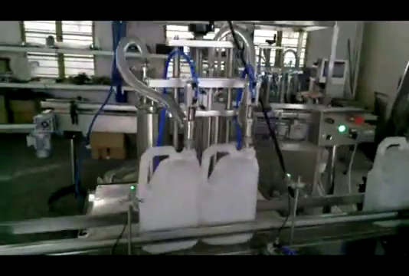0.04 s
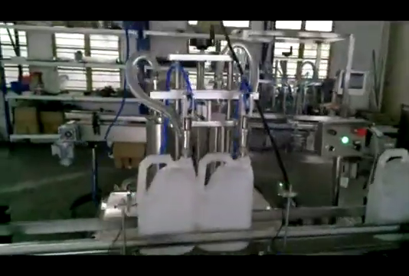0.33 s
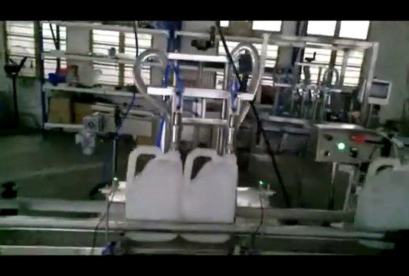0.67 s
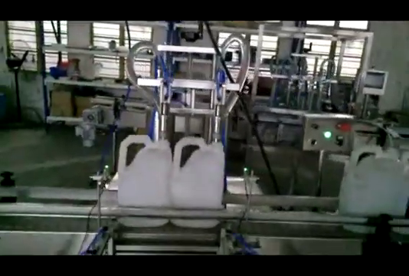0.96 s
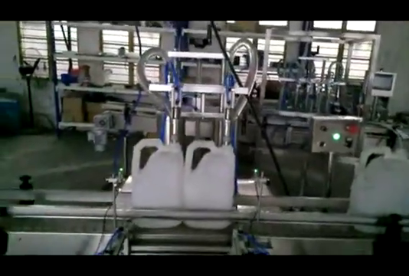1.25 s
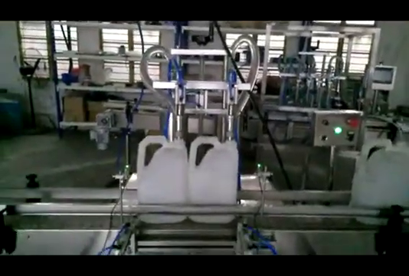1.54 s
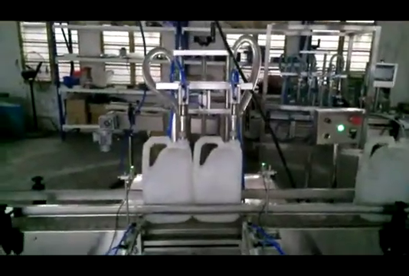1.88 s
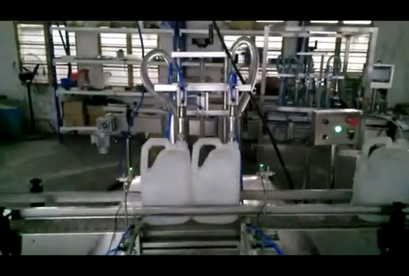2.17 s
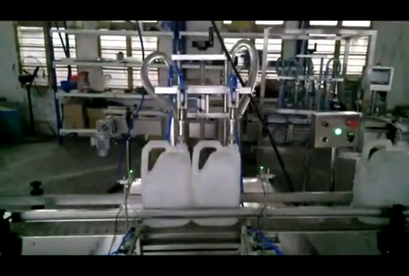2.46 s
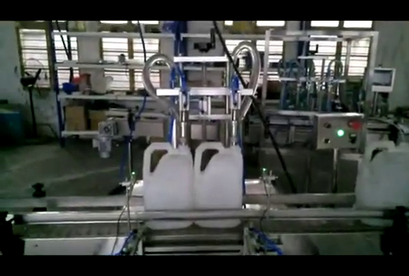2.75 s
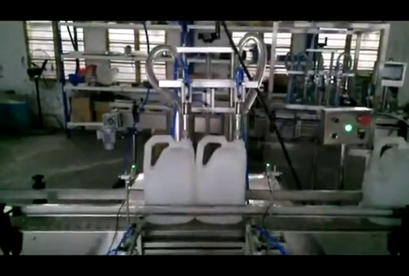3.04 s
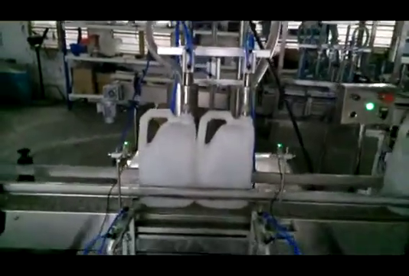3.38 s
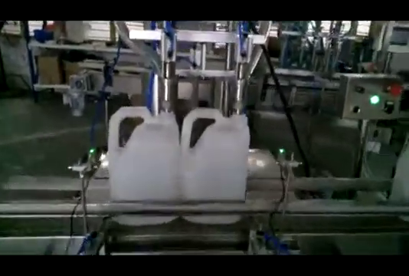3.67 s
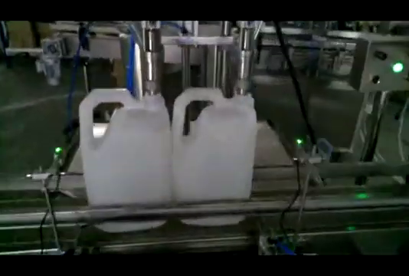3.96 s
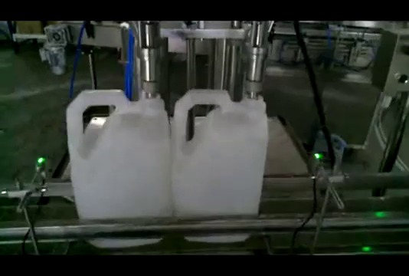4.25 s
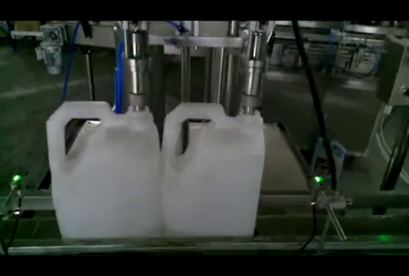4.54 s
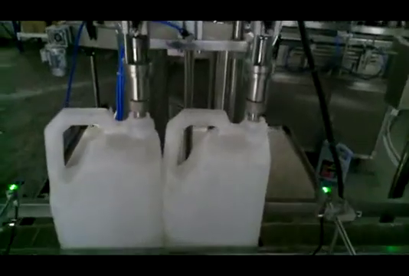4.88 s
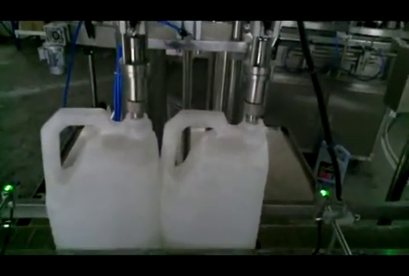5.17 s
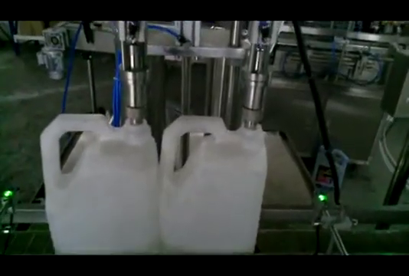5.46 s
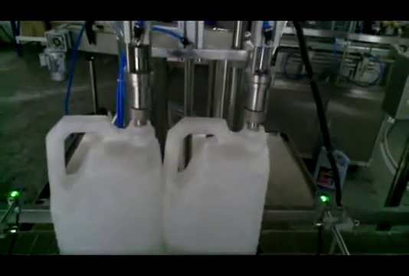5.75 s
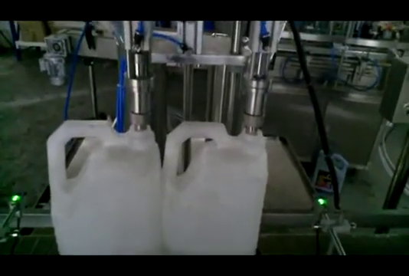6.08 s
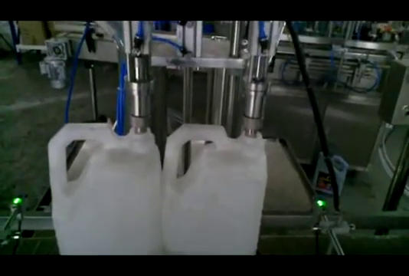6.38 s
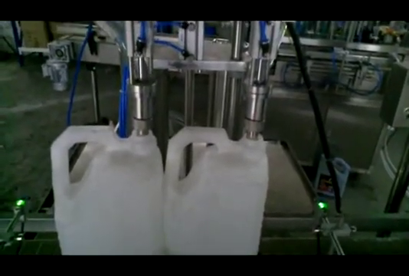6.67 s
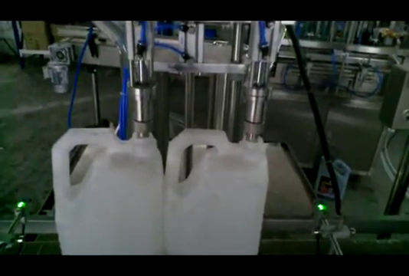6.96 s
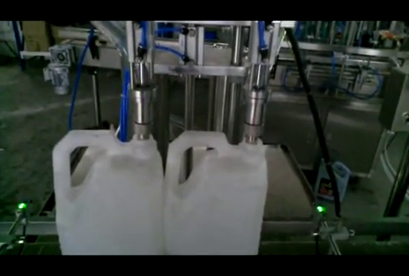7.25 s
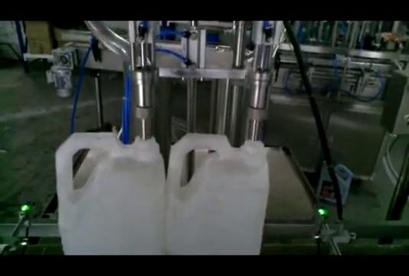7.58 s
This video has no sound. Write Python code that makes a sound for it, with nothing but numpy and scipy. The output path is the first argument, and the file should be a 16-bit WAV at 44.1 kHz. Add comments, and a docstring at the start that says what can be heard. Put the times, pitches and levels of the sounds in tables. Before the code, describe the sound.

Compressed air hisses and sizzles from a bottle filling machine, then vents in loud bursts over a low motor hum.

```python
"""A two-nozzle liquid filler works in a factory workshop, close to a mono phone microphone.
Over the hum of motors, air bleeds away in a gritty hiss, and drops and valve parts tick. At 1 s the frame
knocks and gives two hollow groans. As the bleed shuts off (2-3 s), a wet leak spits, whistles and builds
to a sizzle. From 5.4 s the nozzles lift: the leak dies and valves dump their cylinders in two long bursts
and a short one, while the frame knocks again."""
import sys
import numpy as np
from scipy import signal
from scipy.fft import rfft, irfft
from scipy.io import wavfile

SR = 44100
rng = np.random.default_rng(int(sys.argv[2]) if len(sys.argv) > 2 else 0)


def generate_wav(signal):
    """Clip the signal to [-1, 1] and save it as 16-bit WAV at the path in sys.argv[1]."""
    frames = np.transpose(np.atleast_2d(signal))
    scaled = np.clip(frames, -1, 1) * 32767
    pcm = np.round(scaled).astype(np.int16)
    wavfile.write(sys.argv[1], SR, pcm)


N = 344862
TIME = np.arange(N) / SR
FREQS = np.fft.rfftfreq(N, 1 / SR)


def undb(db):
    """Decibels to gain."""
    return 10 ** (np.asarray(db) / 20)


def unit(x):
    """Scale to rms 1."""
    return x / np.std(x)


def noise():
    """White noise."""
    return rng.standard_normal(N)


def tone(hz):
    """A sine that follows a moving pitch."""
    return np.sin(2 * np.pi * np.cumsum(hz) / SR)


def colour(x, curve):
    """Shape x with an EQ curve (f/Hz, level/dB), then scale to rms 1."""
    hz, db = np.transpose(curve)
    gain = undb(np.interp(np.log(FREQS + 1), np.log(hz), db))
    return unit(irfft(rfft(x) * gain, N))


def resonate(x, modes):
    """Drive a bank of resonances (f/Hz, width/Hz, level/dB) with x."""
    response = sum(undb(db) * 1j * FREQS * width / (hz ** 2 - FREQS ** 2 + 1j * FREQS * width)
                   for hz, width, db in modes)
    return irfft(rfft(x) * response, N)


def drift(rate_hz):
    """Smooth random modulation with spread 1, rolling off above rate_hz."""
    grid = np.arange(0, N / SR + .01, .001)
    hz = np.fft.rfftfreq(len(grid), grid[1])
    spectrum = rfft(rng.standard_normal(len(grid))) * np.exp(-(hz / rate_hz) ** 2)
    return np.interp(TIME, grid, unit(irfft(spectrum, len(grid))))


def gate(start, length, rise, fade):
    """Rise in a straight line, hold until length is over, then fade exponentially; all in s."""
    age = TIME - start
    return np.clip(age / rise, 0, 1) * np.exp(-np.maximum(age - length, 0) / fade)


def swell(centre_s, width_s):
    """A bell-shaped envelope, 1 at its centre."""
    return np.exp(-((TIME - centre_s) / width_s) ** 2)


def sputter(per_s, spread_db, air):
    """Droplets in a jet: tiny bursts of uneven size over a share of smooth air noise."""
    size = undb(spread_db * np.minimum(rng.exponential(size=N), 4))
    bursts = (rng.random(N) < per_s / SR) * size * np.sign(noise())
    return unit(bursts) + air * noise()


def motors():
    """Wavering motor tones and a rough drive whine in a bed of fan noise."""
    # motor tones: f/Hz, level/dB
    hum_lines = [(473.7, -56.5), (705, -61), (742, -58.5), (822, -60.5), (1174, -62.5)]
    # EQ of the fan noise: f/Hz, level/dB
    fan_eq = [(25, -5), (90, -20.5), (240, -12.5), (315, -22), (380, -5), (470, -2), (600, -2), (740, 4),
              (1000, -1.5), (1450, -0.5), (2100, 0), (2700, -2), (7600, -15.5)]
    hum = sum(undb(db + 3 * drift(7)) * tone(hz + 3 * drift(8)) for hz, db in hum_lines)
    whine_hz = 1733 + 25 * drift(4.5) + 45 * drift(120)
    whine_db = -51 + 4 * swell(5.22, .2) + 3 * drift(30)  # swells just before the nozzles lift
    fans = colour(noise(), fan_eq) * undb(-42 + drift(14))
    return hum + tone(whine_hz) * undb(whine_db) + fans


def bleed():
    """Throttled air carries droplets, weaker and more fitful as the pressure falls."""
    # two outlets on one pressure, shutting in turn: t/s, settled level/dB, fade/s
    outlets = [(1.99, -25.5, 0.073), (3.0, -27, 0.14)]
    # EQ of the bleeding air: f/Hz, level/dB
    hiss_eq = [(30, -33), (300, -30.5), (480, -26.5), (1000, -24.5), (1370, -17.5), (1620, -10),
               (2000, -12), (3300, -14.5), (4100, -10.5), (4700, -1), (5300, 0.5), (5950, -7.5),
               (6650, -12), (7600, -22.5)]
    drain_s, full_pressure_db = 1.35, 9
    pressure = np.exp(-TIME / drain_s)
    power = sum((undb(db) * np.exp(-np.maximum(TIME - shuts, 0) / fade)) ** 2
                for shuts, db, fade in outlets)
    flutter_db = (1.05 - .79 * pressure) * drift(70)
    hiss = colour(sputter(per_s=2500, spread_db=2.5, air=1) * undb(flutter_db), hiss_eq)
    dip_db = -7 * swell(2.605, .022)  # the hiss dips once, briefly
    return hiss * np.sqrt(power) * undb(full_pressure_db * pressure + dip_db)


def ticks():
    """Drops and valve parts ping: short rings with a bright, noisy edge and no bass."""
    # pings: t/s, level/dB, f/Hz, t60/s
    pings = [(.2389, -9, 5140, 0.009), (1.06, -7, 5200, 0.0076), (1.822, -21, 4950, .006),
             (3.829, -19, 5500, 0.0066), (3.8835, -19.5, 5570, 0.026), (4.0668, -17, 1900, 0.0085),
             (4.433, -24, 6600, .006), (4.545, -21, 4050, 0.014), (4.754, -24, 5500, 0.015),
             (5.427, -15, 5900, 0.027), (5.436, -13, 5840, 0.11), (5.568, -3.5, 5670, .02)]
    out = np.zeros(N)
    age = np.arange(SR // 10) / SR
    for start, db, hz, t60 in pings:
        ring = np.sin(2 * np.pi * hz * age) + .42 * rng.standard_normal(len(age))
        first = int(start * SR)
        out[first:first + len(age)] += ring * undb(db - 60 * age / t60)
    return signal.sosfilt(signal.butter(2, 1800, "high", fs=SR, output="sos"), out)


def knocks():
    """Each blow sets loose parts rattling in the frame's resonances."""
    # blows to the frame: t/s, level/dB, t60/s
    blows = [(1.024, -24, 0.093), (1.045, -33, 0.98), (5.428, -32, 0.55), (5.699, -34, 0.18),
             (6.394, -31.5, 0.14), (6.554, -35, 0.29), (7.274, -36, 0.37), (7.625, -38, 0.65),
             (7.732, -34.5, 0.36)]
    # resonances of the frame: f/Hz, width/Hz, relative level/dB
    frame_modes = [(238, 79, -10), (384, 26, -8.5), (503, 28, 2.5), (630, 120, -1.5), (760, 170, -2.5),
                   (1000, 120, -1.5), (1190, 130, -1.5), (1720, 200, -10.5)]
    shake = sum(undb(db - 60 * np.maximum(TIME - start, 0) / t60) * (TIME > start)
                for start, db, t60 in blows)
    rattle = noise()
    return resonate(rattle * shake, frame_modes) / np.std(resonate(rattle, frame_modes))


def groan():
    """Two hollow partials slide down together as something flexes after the loudest knock."""
    # groans: t/s, length/s, f/Hz, level/dB
    flexes = [(1.029, 0.031, 605, -33), (1.086, .05, 510, -38.5)]
    sink_oct_per_s = 2.2
    waver = 1 + .013 * drift(83)
    out = 0
    for start, length, hz, db in flexes:
        pitch = hz * waver * 2 ** (-sink_oct_per_s * np.maximum(TIME - start, 0))
        partials = tone(pitch) + undb(-5.5) * tone(.73 * pitch)
        out += partials * undb(db) * gate(start, length, rise=.016, fade=.015)
    return out


def spits():
    """The leak spits crackly gushes of air and liquid, each with its own cavity resonance."""
    # gushes: t/s, length/s, level/dB, rise/s, fade/s, cavity f/Hz
    gushes = [(2.482, 0.1, -31.5, 0.011, 0.056, 1880), (3.329, 0.11, -28.5, 0.018, 0.046, 5900),
              (4.061, 0.065, -25, 0.0045, 0.039, 2000), (5.34, 0.079, -37, 0.0098, .06, 2290)]
    # EQ of the spray: f/Hz, level/dB
    spray_eq = [(250, -29), (600, -9), (850, -13), (1100, -6.5), (1500, -4), (2150, -4), (2600, -1),
                (3550, -6), (4000, 0), (4600, -3), (5800, -0.5), (6600, -8), (7600, -16.5)]
    out = 0
    for start, length, db, rise, fade, hz in gushes:
        spray = sputter(per_s=2000, spread_db=1.5, air=.78)
        cavity = resonate(spray, [(hz, 300, 0)])
        out += colour(spray + cavity, spray_eq) * undb(db) * gate(start, length, rise, fade)
    return out


def whistle():
    """The leak's narrow gap locks into an unsteady, stuttering note; a weak lower one swells once."""
    # whistled notes: t/s, length/s, f/Hz, level/dB
    notes = [(2.65, .17, 5240, -29), (3.64, .045, 5328, -26.5), (3.714, .045, 5335, -27),
             (3.785, .02, 5320, -32), (3.915, 0.022, 5320, -31)]
    waver_hz, flutter_db = 35 * drift(200), 2.4 * drift(70)
    upper = sum(tone(hz + waver_hz) * undb(db) * gate(start, length, rise=.008, fade=.035)
                for start, length, hz, db in notes)
    lower = tone(2730 + 25 * drift(110)) * undb(-42.5) * swell(3.79, .092)
    return upper * undb(flutter_db) + lower


def leak():
    """A wet gap sizzles in one broad resonance: it builds, runs evenly and stops as the nozzles lift."""
    # EQ of the sizzle: f/Hz, level/dB
    sizzle_eq = [(300, -47.5), (1000, -30), (2900, -24.5), (3600, -13), (4300, -14), (4900, -7), (5250, -1),
                 (5500, -0.5), (5850, -6.5), (6200, -13.5), (6800, -18), (7600, -25.5)]
    drops = sputter(per_s=2000, spread_db=1.5, air=.9) * undb(drift(70))
    flow = gate(start=2.8, length=2.7, rise=.39, fade=.2)
    return colour(drops, sizzle_eq) * flow * undb(-34)


def exhausts():
    """A valve opens, the jet holds briefly, then fades as its cylinder empties; the port rings."""
    # air dumps: t/s, level/dB, rise/s, hold/s, fall/(dB/s), port (0 or 1)
    dumps = [(5.421, -14.5, 0.02, 0.105, 13, 0), (6.383, -15, 0.0067, 0.15, 13.5, 1),
             (7.268, -21.5, 0.0074, 0.025, 77.5, 1)]
    # EQ of each port: f/Hz, level/dB
    first_eq = [(40, -26), (300, -32), (730, -17.5), (1100, -18), (1600, -9), (2400, -8), (3100, -1),
                (4050, -3), (5000, 1), (5800, 0), (6400, -6.5), (7200, -8), (7600, -20.5)]
    second_eq = [(40, -28), (300, -29), (750, -33.5), (1100, -19.5), (1550, -13), (2200, -13), (3000, -7.5),
                 (3700, -4.5), (4300, -1), (5600, 2.5), (6300, -3.5), (7000, -7.5), (7600, -17.5)]
    # narrow resonances of each port: f/Hz, width/Hz, relative level/dB
    first_modes = [(2150, 22, 2), (2532, 18, 1), (2967, 16, 1), (3074, 16, 0), (3205, 14, 3), (3345, 20, 0),
                   (3550, 16, -1), (3749, 22, 2), (4590, 35, -3), (4900, 60, -6), (5240, 35, -4)]
    second_modes = [(2990, 50, -5), (4398, 25, -3), (5405, 22, -2), (5852, 18, -4), (6074, 12, 7),
                    (6565, 20, -4), (7186, 18, -2)]
    ports = [(first_eq, first_modes), (second_eq, second_modes)]
    out = 0
    for start, db, rise, hold, fall, port in dumps:
        eq, modes = ports[round(port)]
        age = np.maximum(TIME - start, 0)
        attack = 1 - np.exp(-age / rise)
        drop_db = fall * np.maximum(age - hold, 0)
        jet = noise() * undb(.33 * drift(40))
        # a fast jet rings the port harder than a slack one
        ring = colour(resonate(jet, modes), eq) * undb(-9.5 - .22 * drop_db)
        out += (colour(jet, eq) + ring) * attack * undb(db - drop_db)
    return out


def workshop(x, t60=.42, wet_db=-14):
    """Hard walls and steel add a diffuse tail."""
    age = np.arange(SR) / SR
    tail = rng.standard_normal(SR) * undb(-60 * age / t60) * (age > .004)
    return x + undb(wet_db) * signal.fftconvolve(x, tail / np.linalg.norm(tail))[:N]


def scene():
    """Air and knocks feed the room, the rest stays dry; both channels are the same."""
    air = bleed() + leak() + spits() + exhausts()
    mix = workshop(air + knocks()) + whistle() + groan() + ticks() + motors()
    return np.array([mix, mix])


def record(dry):
    """The phone's microphone has one narrow notch and cuts the top treble steeply."""
    notched = dry - resonate(dry, [(900, 89, -1.6)])
    high_cut = signal.ellip(12, .2, 80, 7600, fs=SR, output="sos")
    return signal.sosfilt(high_cut, notched)


dry = scene()
out = record(dry)
generate_wav(out)
```